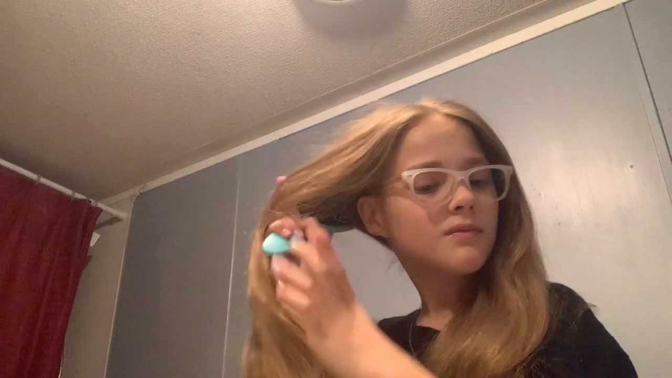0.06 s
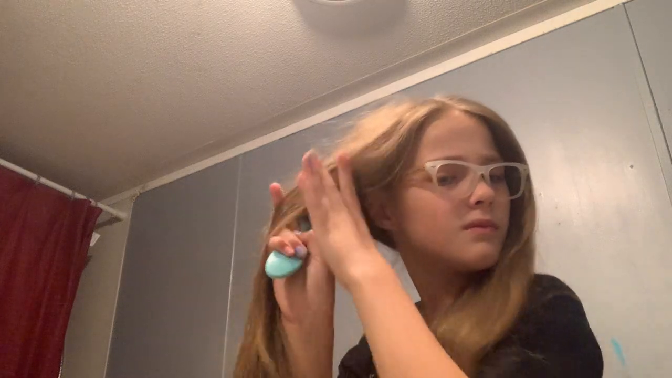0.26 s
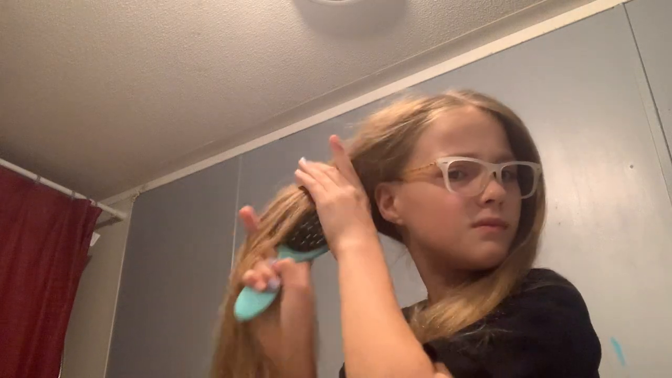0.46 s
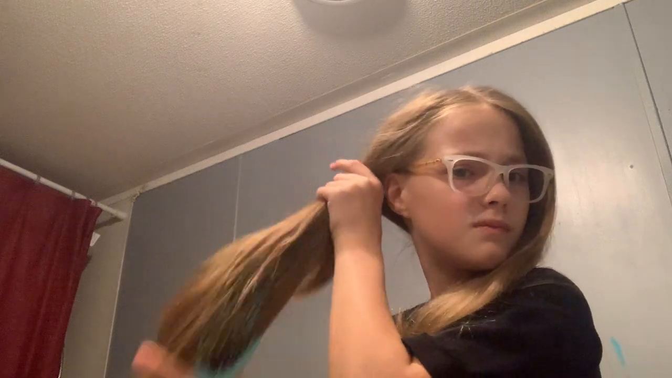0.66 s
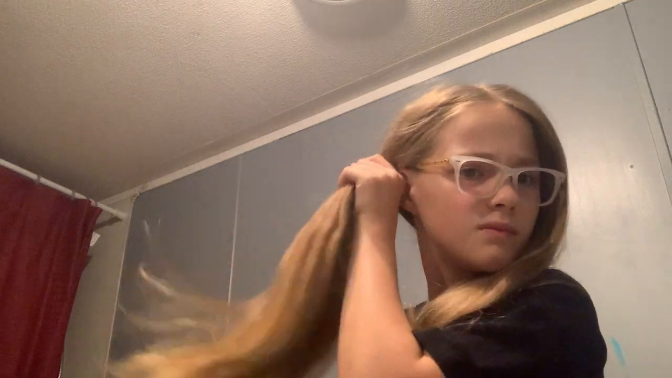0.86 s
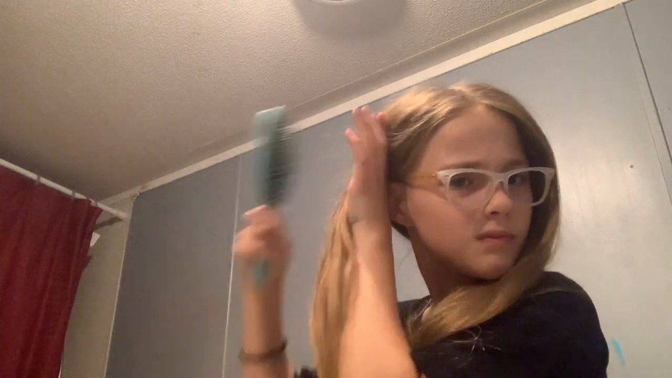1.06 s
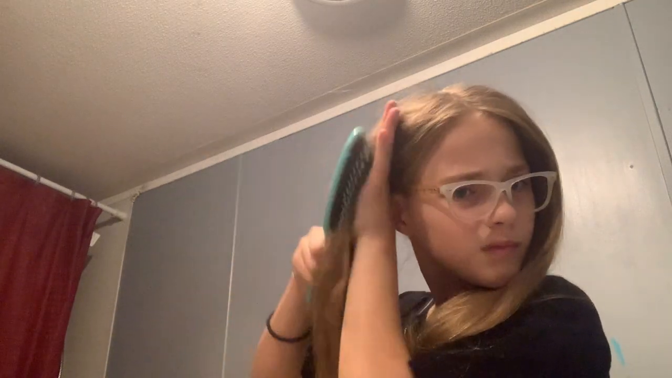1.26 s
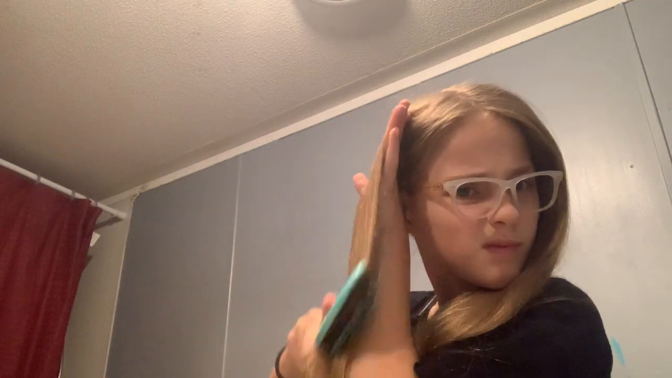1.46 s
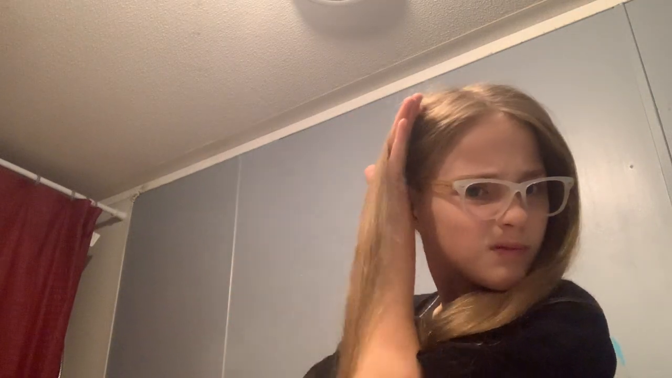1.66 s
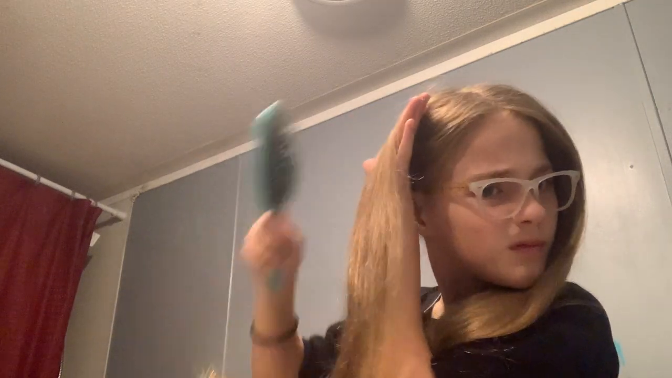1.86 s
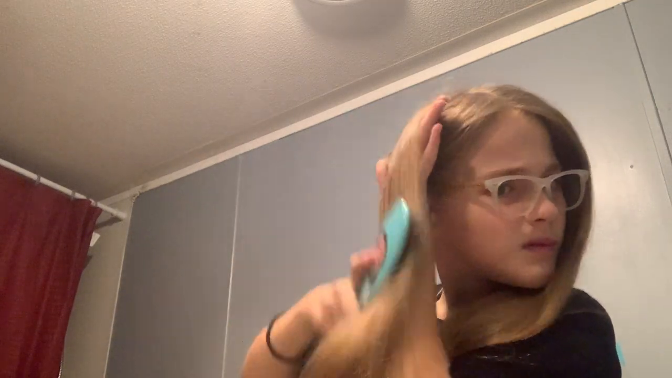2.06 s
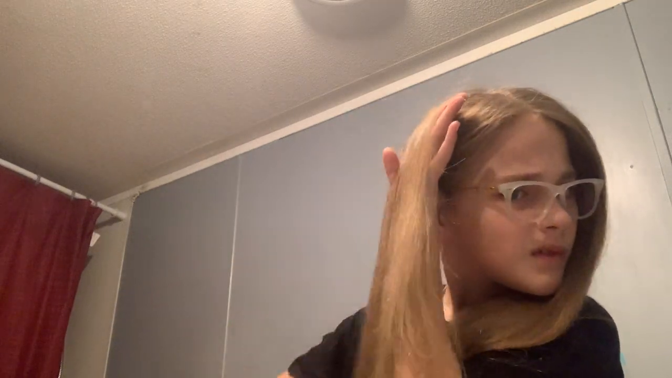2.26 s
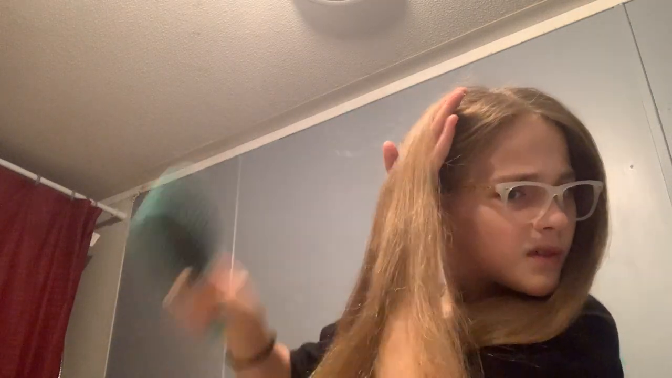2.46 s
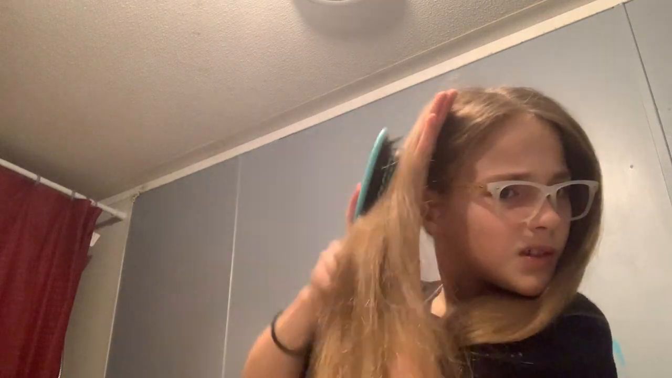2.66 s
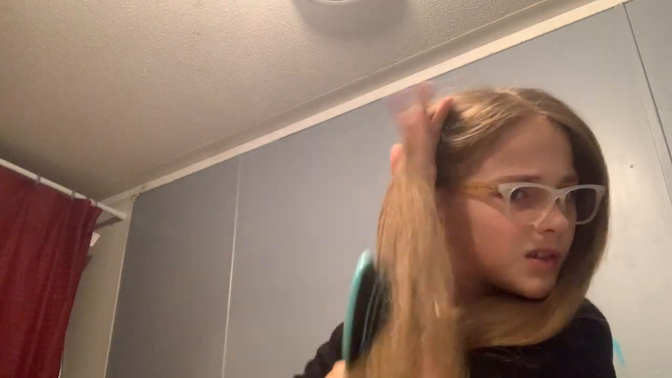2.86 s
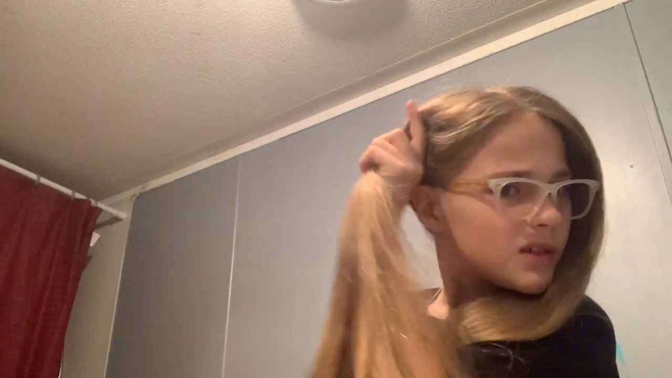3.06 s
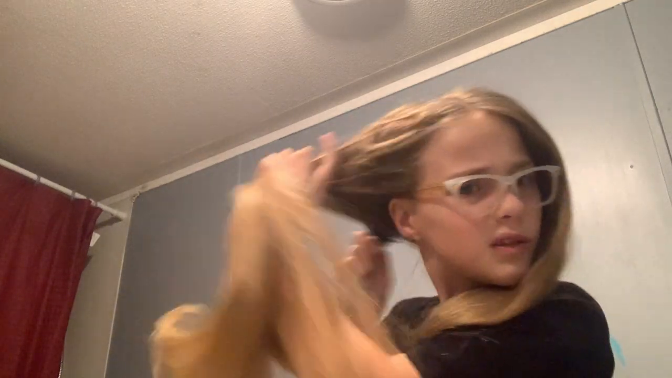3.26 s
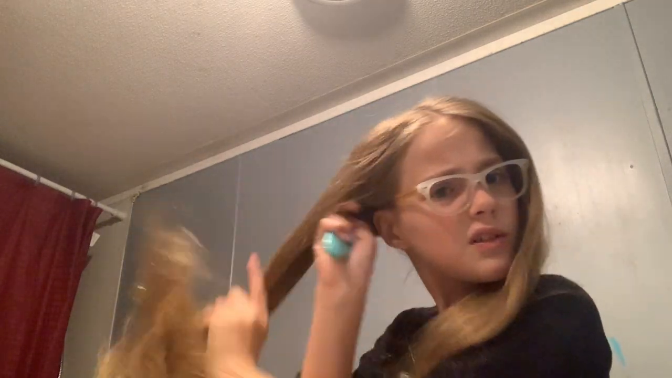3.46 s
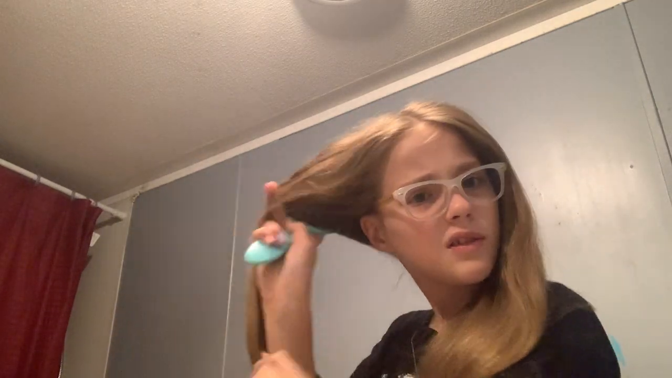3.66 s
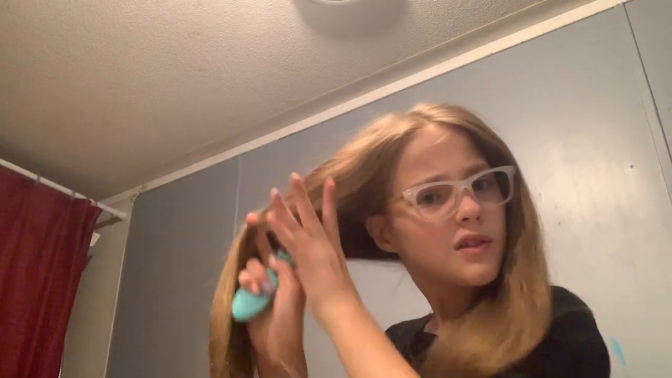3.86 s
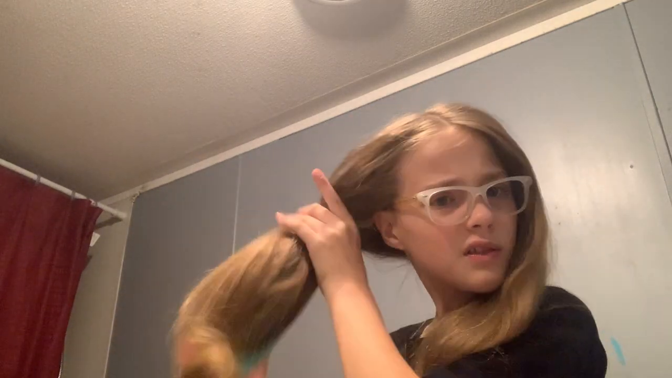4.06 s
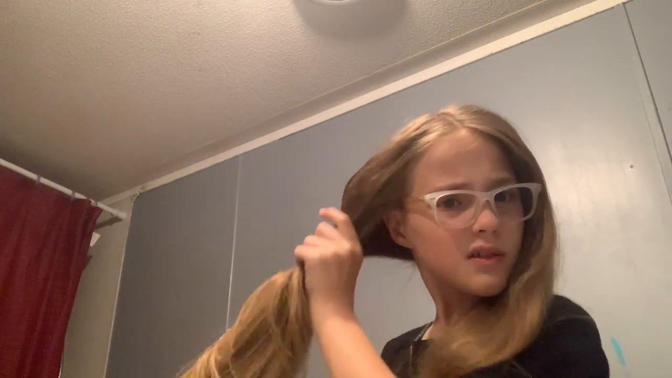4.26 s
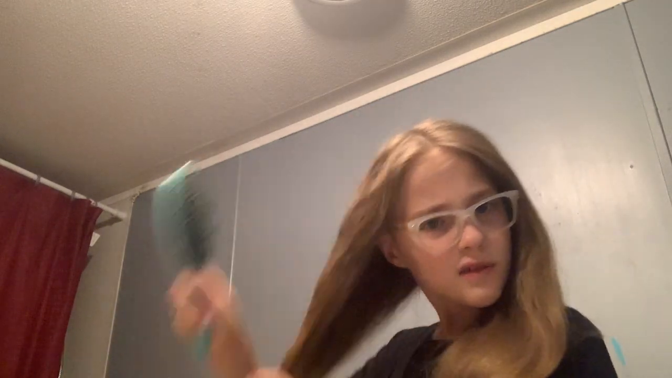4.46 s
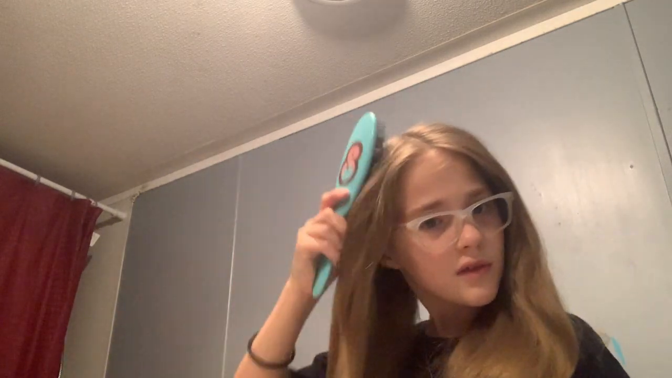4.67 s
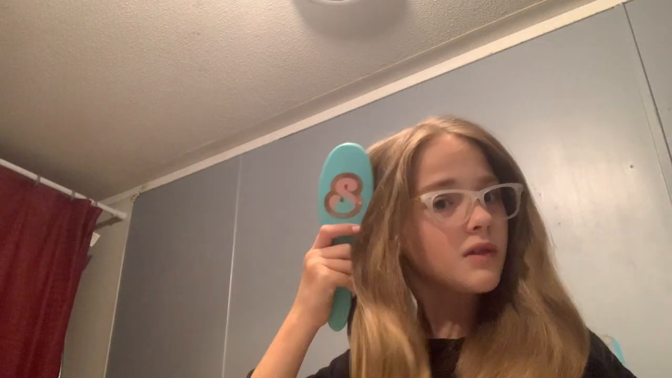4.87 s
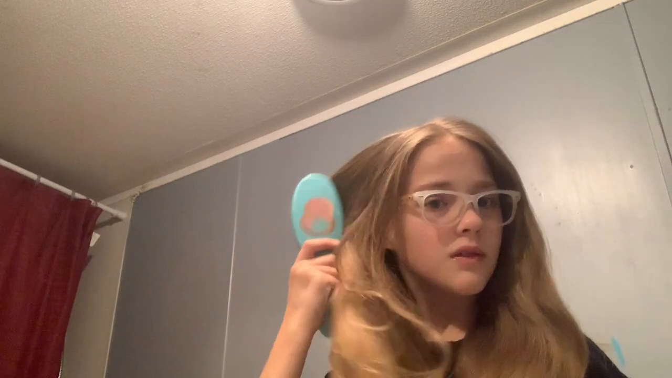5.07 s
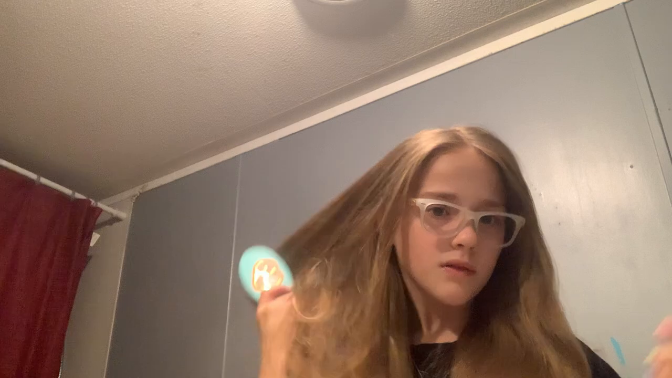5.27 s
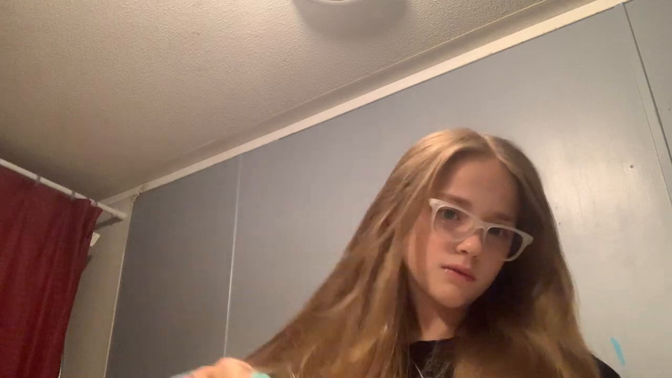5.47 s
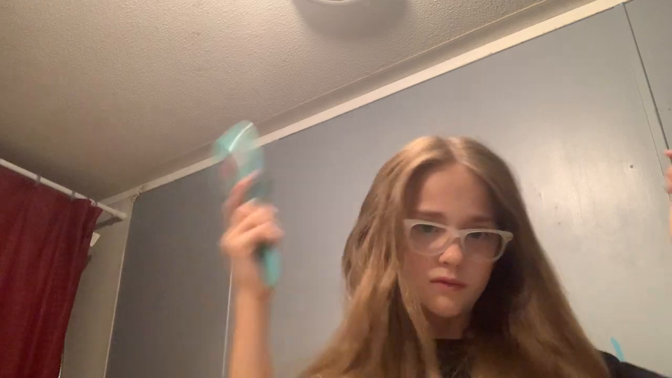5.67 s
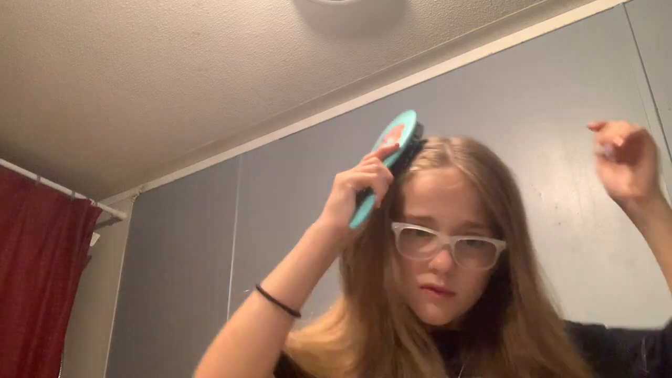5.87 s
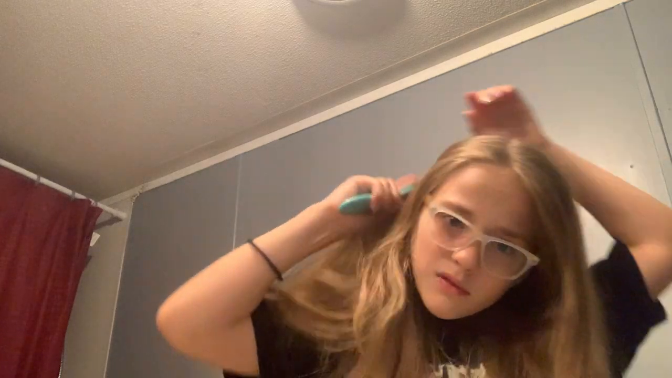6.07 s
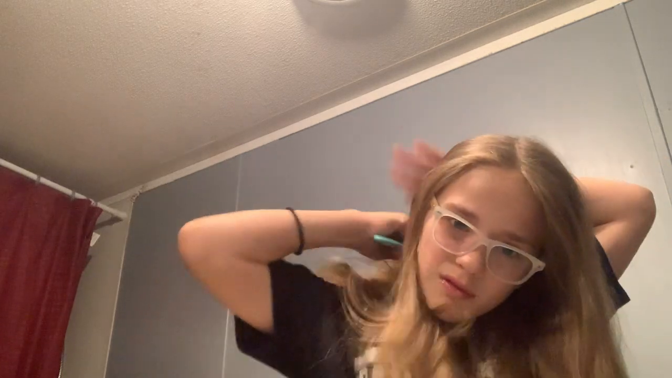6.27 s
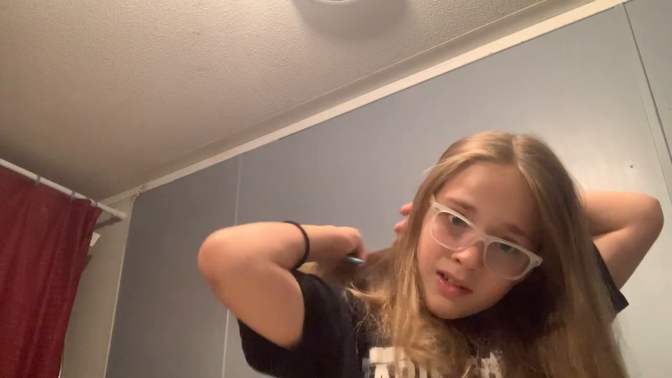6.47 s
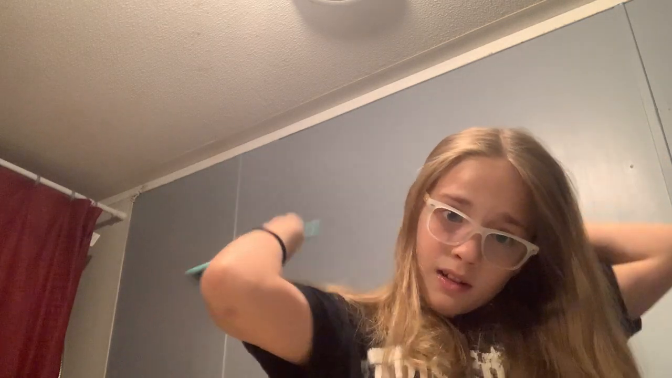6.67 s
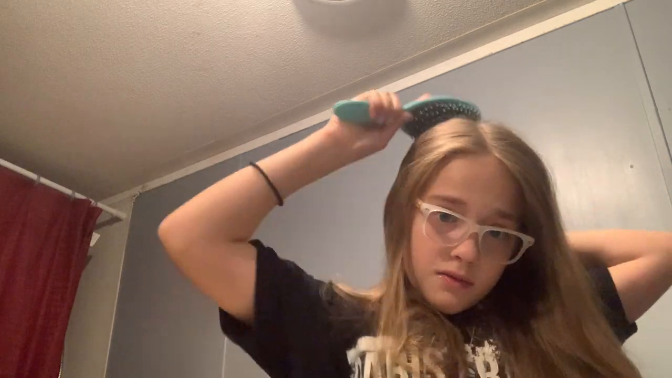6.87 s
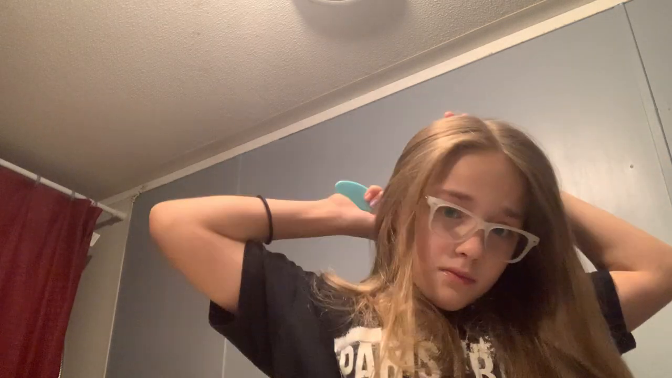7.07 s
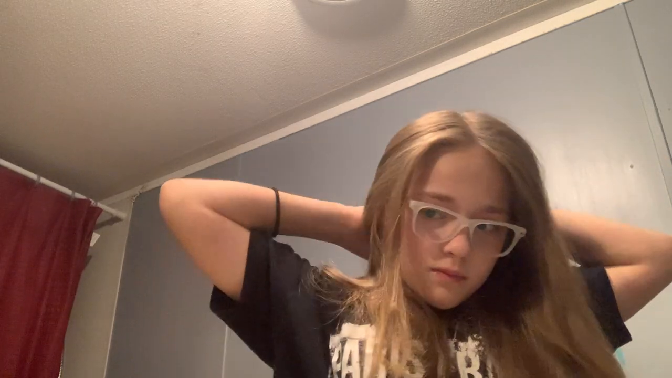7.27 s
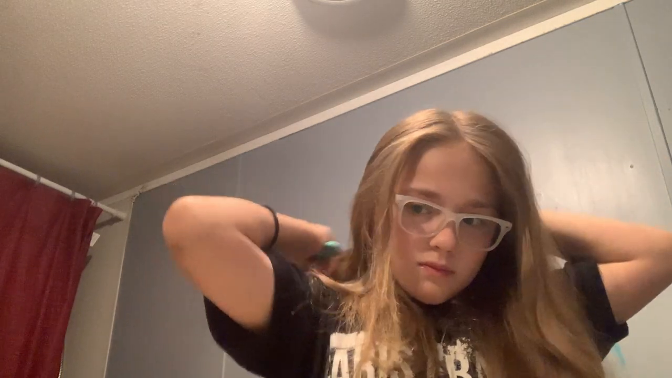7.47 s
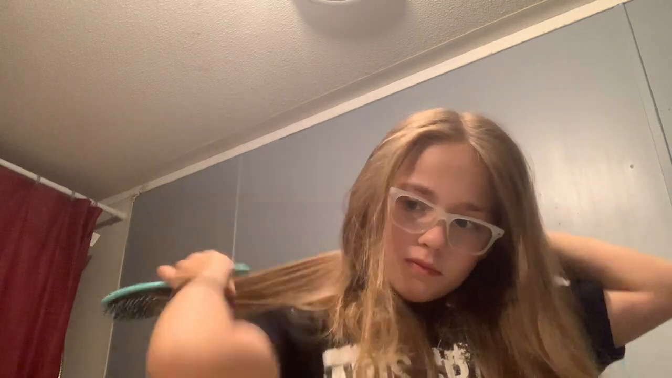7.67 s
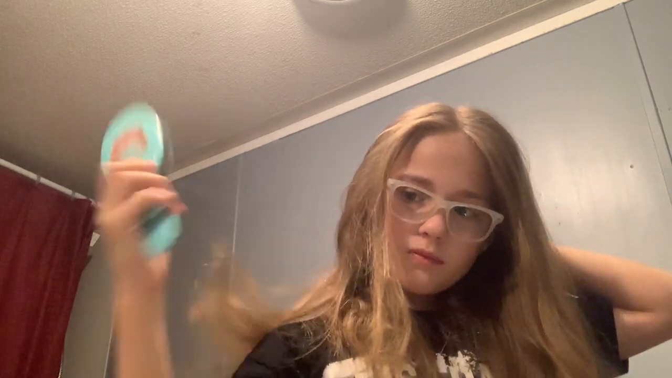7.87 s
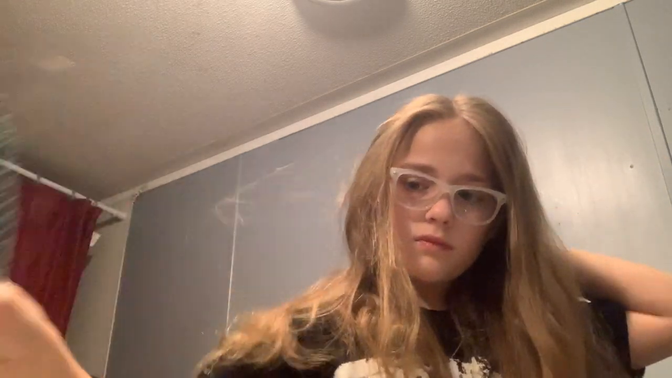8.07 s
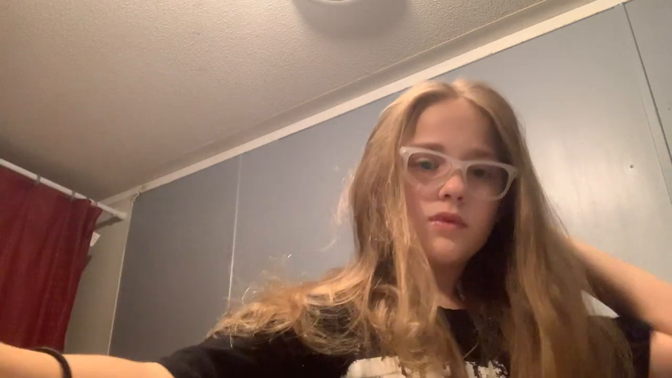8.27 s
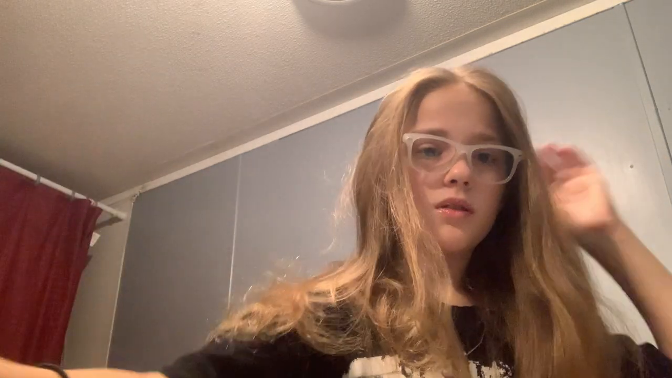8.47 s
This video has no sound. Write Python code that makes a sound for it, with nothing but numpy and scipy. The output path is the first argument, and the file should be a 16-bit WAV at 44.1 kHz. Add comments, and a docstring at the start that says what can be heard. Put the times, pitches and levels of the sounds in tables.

```python
"""Brushing long hair beside a fan

A plastic paddle brush is pulled through long hair, stroke after stroke, in a small room where a fan hums.
Friction noise, from many random slips, makes the strands hiss and rasp; tangles pluck the resonant cushion.
Short decaying noise bursts are flicking bristles, snapping strands and a creaking handle.
At the end the brush meets a counter beside the two-port microphone: damped modes and noise bursts
give its knocks and rocking, and friction noise its slide."""
import sys
import numpy as np
from scipy import signal
from scipy.fft import rfft, irfft, next_fast_len
from scipy.io import wavfile
from scipy.ndimage import uniform_filter1d, map_coordinates

SR = 44100
rng = np.random.default_rng(int(sys.argv[2]) if len(sys.argv) > 2 else 0)


def persist_wave(psi):
    """Save psi, clipped to +-1, as 16-bit WAV."""
    counts = np.round(np.clip(psi, -1, 1) * 32767).astype(np.int16)
    wavfile.write(sys.argv[1], SR, np.atleast_2d(counts).T)


N = 375732  # length in samples

# Pulls of brush or hand through the hair. Each row: start of full contact in seconds, hold in seconds,
# rise in seconds, hiss of sliding strands in dB, rasp of dragging bristles in dB,
# change over the hold in dB, top treble relative to the hiss in dB.
STROKES = [(0.0, 0.32, .1, -60.5, -63, -6.5, -8), (0.63, 0.2, 0.36, -49.5, -55.5, -1.5, -2.5),
           (1.288, .11, 0.15, -55.5, -56.5, -4, -16), (1.448, 0.22, 0.24, -50, -53, -7, -1.5),
           (2.007, 0.037, .03, -68, -60, -1, -2), (2.086, 0.032, 0.089, -54.5, -52.5, 0, -2),
           (2.227, 0.11, .3, -57.5, -53.5, 0.5, -2), (2.554, 0.075, 0.38, -58.5, -58.5, -1.5, -9),
           (2.813, 0.068, 0.061, -53.5, -51, 0, -5), (2.977, 0.076, 0.3, -58, -55.5, 0, -2),
           (3.198, 0.52, 0.14, -77, -69, 8, -2), (3.553, 0.26, 0.17, -62, -70, -2, -3),
           (4.098, 0.18, 0.43, -54, -59.5, 0.5, -1.5), (4.54, 0.29, 0.22, -79, -64, 4, -1),
           (4.97, 0.44, 0.33, -60, -60.5, -0.5, -2), (5.918, 0.042, .05, -54.5, -57, 1.5, -7),
           (6.102, .18, 0.3, -50, -51, -12, -6), (6.41, 0.24, 0.23, -60.5, -56.5, -6, -3),
           (7.045, .02, 0.13, -56, -51.5, -0.5, -5), (7.21, .04, .1, -69, -61, -2.5, -2),
           (7.47, 0.23, 0.28, -63, -63, -4.5, -2)]
# Spectrum of sliding strands. Each row: frequency in Hz, relative level in dB per Hz.
HISS_SPECTRUM = [(2000, -22.5), (5000, -3), (7000, -6), (9000, -3), (11500, -2), (13500, 2), (15000, 6),
                 (16000, -8.5)]
# Spectrum of dragging bristles. Each row: frequency in Hz, relative level in dB per Hz.
RASP_SPECTRUM = [(400, -22), (850, 0.5), (1200, 8.5), (1800, -1.5), (2300, 6.5), (3000, -1.5), (3400, 2),
                 (3850, 1), (4700, -3), (5600, -11), (6400, -4), (9000, -19), (15000, -19)]
REST_HISS_DB, REST_RASP_DB = -86, -65  # hair rustling in the hand between pulls
GRIP_PER_S, GRIP_HISS_DB, GRIP_RASP_DB = 45, 0.9, 0.4  # uneven drag as bristles catch and slip
FIRM_PULL_DB = -55  # rasp level at which rattle and scratch have the levels below
RATTLE_DB, RATTLE_GROWS = -54.5, 0.73  # cushion rattle; its dB per dB of rasp
SCRATCH_DB, SCRATCH_GROWS = -67, 1.15  # ticking bristle tips; their dB per dB of rasp


def strokes():
    """Sliding friction: strands hiss and bristles rasp; a harder pull also excites cushion and bristle tips."""
    glide = np.full(N, amp(REST_HISS_DB))
    sheen = np.zeros(N)
    drag = np.full(N, amp(REST_RASP_DB))
    for start, hold, rise, hiss_db, rasp_db, change_db, sheen_db in STROKES:
        contact = pull(start, hold, rise, change_db)
        # unrelated noises add in power
        glide = np.hypot(glide, amp(hiss_db) * contact)
        sheen = np.hypot(sheen, amp(hiss_db + sheen_db) * contact)
        drag = np.hypot(drag, amp(rasp_db) * contact)
    sheen = np.hypot(sheen, amp(REST_HISS_DB))
    grip = wobble(GRIP_PER_S)

    sliding = friction(HISS_SPECTRUM, slips_per_s=3300, smooth_db=2.0, patchy_db=0.0)
    top = filtered(sliding, lambda hz: along([(11500, 0.017), (14000, 1)], hz))
    hiss = amp(GRIP_HISS_DB * grip) * (glide * (sliding - top) + sheen * top)

    dragging = friction(RASP_SPECTRUM, slips_per_s=800, smooth_db=5.5, patchy_db=2.5)
    rasp = drag * amp(GRIP_RASP_DB * grip) * dragging

    firmness = drag / amp(FIRM_PULL_DB)
    catch_spectrum = [(400, -16.0), (900, -1.5), (5000, 1.0), (9000, -19.5)]
    catches = friction(catch_spectrum, slips_per_s=220, smooth_db=-10.0, patchy_db=1.5)
    rattle = amp(RATTLE_DB) * firmness ** RATTLE_GROWS * cushion(catches)
    scratch = amp(SCRATCH_DB) * firmness ** SCRATCH_GROWS * bristles()
    return hiss + rasp + rattle + scratch


RELEASE_S, FADE_DB = 0.13, 28  # time of running off the hair; depth of each rise and release


def pull(start, hold, rise, change_db):
    """Exponential growth and decay of contact: the brush sinks in, drags and runs off the ends."""
    t = np.arange(N) / SR - start
    away = np.maximum(-t, 0) / rise + np.maximum(t - hold, 0) / RELEASE_S
    drift_db = change_db * np.clip(t / hold, 0, 1)
    return amp(drift_db - FADE_DB * np.minimum(away, 10))


def friction(spectrum, slips_per_s, smooth_db, patchy_db):
    """Stick-slip noise: random slips on a bed of smooth noise, with a shifting colour as strands take load."""
    slips = (rng.random((2, N)) < slips_per_s / SR) * rng.standard_normal((2, N))
    rub = unit(slips) + amp(smooth_db) * rng.standard_normal((2, N))
    return ports(patchy(rub, patchy_db), spectrum, NEAR_ALIKE)


def patchy(x, depth_db):
    """Time-varying spectral colour: random patches, some hundred Hz wide, come and go."""
    z = signal.stft(x, nperseg=1024)[2]
    field = rng.standard_normal(z.shape[1:])
    field = uniform_filter1d(field, size=6, axis=0)  # smooth over frequency
    field = uniform_filter1d(field, size=7, axis=1)  # smooth over time
    return signal.istft(z * amp(depth_db * unit(field)), nperseg=1024)[1][:, :N]


BRISTLES_PER_S, BRISTLE_SIZE_DB = 420, 12  # ticks a second; range of their sizes
BRISTLE_HZ, BRISTLE_SPREAD = 3700, 0.44  # middle pitch; its range either way (natural log)
BRISTLE_T60_S = .005


def bristles():
    """Damped free vibration: bristle tips tick one after another, each with its own pitch and size; rms 1."""
    t = np.arange(SR // 100) / SR
    out = np.zeros((2, N))
    draws = rng.uniform(-1, 1, (int(BRISTLES_PER_S * N / SR), 4))
    for k, (late, pitch, size, phase) in enumerate(draws):
        hz = BRISTLE_HZ * np.exp(BRISTLE_SPREAD * pitch)
        ring = np.sin(2 * np.pi * hz * t + [[0], [np.pi * phase]])  # the ports differ in phase
        decay = amp(BRISTLE_SIZE_DB * size / 2 - 60 * t / BRISTLE_T60_S)
        add(out, abs(k + 2 * late) / BRISTLES_PER_S, decay * ring)
    return unit(out)


# Resonances of the brush's cushion and shell. Each row: frequency in Hz, width in Hz, relative level in dB.
CUSHION = [(360, 74, 4.5), (797, 106, 12), (866, 226, 7), (1170, 125, 3), (2230, 870, -20),
           (4350, 540, -23)]


def cushion(x):
    """Forced resonance: a force on the bristles drives parallel modes of alternating sign; rms 1."""
    def body(hz):
        response = 0
        for k, (centre, width, db) in enumerate(CUSHION):
            damping = 1j * hz * width
            response = response + (-1) ** k * amp(db) * damping / (centre ** 2 - hz ** 2 + damping)
        return response
    return unit(filtered(x, body))


# Tangles and jolts plucking the cushion. Each row: start in seconds, level in dB,
# treble snap in dB (the force spectrum from 3 to 5 kHz, relative to its other points).
TUGS = [(0.811, -40.5, -3), (1.458, -45, 0), (1.543, -41.5, -13), (1.596, -34.5, -5), (1.625, -48, -2),
        (1.656, -46, -6), (2.002, -39.5, -4), (2.069, -37.5, -9), (2.093, -48, -9), (2.252, -46, -4),
        (2.32, -40.5, -9), (2.645, -40.5, 2), (2.806, -42, 0), (2.858, -46, -2), (3.977, -43, 1),
        (6.98, -44, -8), (7.385, -50, 0), (7.713, -34.5, -10), (7.76, -47, -8)]


def tugs():
    """Impulsive excitation: a tangle letting go, or a jolt of the hand, plucks the hollow cushion."""
    out = np.zeros((2, N))
    t = np.arange(SR // 4) / SR
    for s, db, snap_db in TUGS:
        spectrum = [(300, -3.5), (900, -9.0), (3000, snap_db), (5000, snap_db), (10000, -14.0)]
        force = ports(rng.standard_normal((2, len(t))), spectrum, NEAR_ALIKE)
        add(out, s, burst(t, db, t60_s=0.14, attack_s=0.00054) * cushion(force))
    return room(out, wet_db=-2.5)


# Bristles flicking free. Each row: start in seconds, level in dB.
FLICKS = [(1.1974, -55), (1.279, -47), (1.458, -50), (1.994, -49.5), (2.6467, -41.5), (3.329, -43.5),
          (3.5189, -50), (4.295, -39.5), (4.67, -53), (4.7613, -42.5), (4.776, -41.5), (4.956, -48.5),
          (6.8962, -40.5)]
# Spectrum of a flick. Each row: frequency in Hz, relative level in dB per Hz.
FLICK_SPECTRUM = [(800, -7), (3000, -0.5), (5000, -1.5), (8000, -1.5), (12500, -2), (16000, -2)]


def flicks():
    """Elastic release: a bristle springs back against its neighbours in a short bright spit."""
    out = np.zeros((2, N))
    t = np.arange(SR // 4) / SR
    for s, db in FLICKS:
        spit = ports(rng.standard_normal((2, len(t))), FLICK_SPECTRUM, NEAR_ALIKE)
        add(out, s, burst(t, db, t60_s=0.049, attack_s=0.0011) * spit)
    return room(out, wet_db=-3.5)


# Snagged strands snapping off a bristle. Each row: start in seconds, level in dB.
SNAGS = [(1.4588, -33), (1.4632, -31), (1.596, -36), (1.6238, -41), (2.0653, -44), (2.081, -46),
         (2.7996, -35), (2.827, -42), (2.851, -38), (3.9879, -39)]
# Spectrum of a snap. Each row: frequency in Hz, relative level in dB per Hz.
SNAG_SPECTRUM = [(400, 2), (1000, 13.5), (1600, -3), (2200, 4), (3200, -6), (4800, -6.5), (6500, -20),
                 (15000, -15)]


def snags():
    """Sudden release of tension: a snagged strand snaps free with a dry crack."""
    out = np.zeros((2, N))
    t = np.arange(SR // 8) / SR
    for s, db in SNAGS:
        crack = ports(rng.standard_normal((2, len(t))), SNAG_SPECTRUM, NEAR_ALIKE)
        add(out, s, burst(t, db, t60_s=.035, attack_s=0.00074) * crack)
    return room(out, wet_db=-6.0)


# Taut strands singing against the bristles. Each row: start in seconds, hold in seconds, pitch in Hz,
# level in dB.
SCRAPES = [(1.44, .07, 4600, -61), (1.575, .06, 4370, -60), (2.83, .03, 3340, -56), (2.88, .07, 4720, -61),
           (2.977, .06, 4500, -61), (6.38, .025, 5270, -60), (6.405, .035, 3520, -62),
           (6.455, .025, 3630, -58), (6.525, .012, 4070, -62), (6.545, 0.044, 3680, -62),
           (6.64, .025, 4070, -64), (6.727, .015, 4100, -61)]
SCRAPE_RISE_S, SCRAPE_CHANGE_DB = 0.033, -7  # onset; change of level over the hold
SCRAPE_WIDTH_HZ = 170  # half-amplitude distance either side of the pitch
SCRAPE_SLIPS_PER_S, SCRAPE_UNEVEN_DB = 70, 1  # the strands catch and let go


def scrape():
    """Amplitude modulation: slow noise on a tone gives each taut, singing strand a narrow band of its own."""
    t = np.arange(N) / SR
    out = np.zeros((2, N))
    noise = rng.standard_normal((2, N))
    flutter = filtered(noise, lambda hz: 1 / (1 + (hz / SCRAPE_WIDTH_HZ) ** 2))
    flutter = unit(flutter * amp(SCRAPE_UNEVEN_DB * wobble(SCRAPE_SLIPS_PER_S)))
    for s, hold, hz, db in SCRAPES:
        tone = np.sqrt(2) * np.sin(2 * np.pi * hz * t)
        out += amp(db) * pull(s, hold, SCRAPE_RISE_S, SCRAPE_CHANGE_DB) * flutter * tone
    return out


# The handle shifting in the grip. Each row: start in seconds, level in dB.
CREAKS = [(7.712, -50), (7.728, -56), (7.995, -51), (8.003, -49), (8.013, -50)]
# Spectrum of a creak. Each row: frequency in Hz, relative level in dB per Hz.
CREAK_SPECTRUM = [(800, -14), (2200, 1), (2900, 7), (4200, 0), (5500, -4), (7000, -11), (10000, -21),
                  (15000, -20)]


def creaks():
    """Stick-slip in the grip: the plastic handle ticks drily as the hand turns the brush."""
    out = np.zeros((2, N))
    t = np.arange(SR // 8) / SR
    for s, db in CREAKS:
        tick = ports(rng.standard_normal((2, len(t))), CREAK_SPECTRUM, NEAR_ALIKE)
        add(out, s, burst(t, db, t60_s=0.041, attack_s=.001) * tick)
    return room(out, wet_db=-6)


# Brush meeting the counter. Each row: start in seconds, counter ring in dB, shell ring in dB, clack in dB,
# brightness in dB per octave.
KNOCKS = [(8.2705, -48, -80, -31, -6), (8.2774, -22, -33, -16, -1.3), (8.2822, -17, -36, -13, -0.4),
          (8.2875, -21, -43, -18.5, -2), (8.322, -34, -48, -25, 0.5), (8.332, -30, -45, -18, -3),
          (8.3815, -29, -23, -11, 1.9), (8.3856, -29, -27.5, -17, -3), (8.402, -47, -36, -30, -1.5),
          (8.443, -45, -40.5, -31.5, -5)]
# Modes of the counter. Each row: frequency in Hz, relative level in dB, 60 dB decay time in seconds.
COUNTER = [(80.5, -17, 0.29), (150, -9, 0.16), (192, -10, 0.15), (268, -16, 0.17), (312, -14, 0.3),
           (372, -9, 0.18), (492, -1, 0.24), (580, -12, 0.16), (651, 1.5, 0.23), (755, -9, 0.1),
           (868, -22, 0.4), (900, -10, 0.28), (1050, -21, 0.3), (1150, -22, 0.36), (1450, -24, 0.35),
           (1650, -13, .12)]
# Modes of the plastic shell. Each row: frequency in Hz, relative level in dB, 60 dB decay time in seconds.
PADDLE = [(260, -5, 0.046), (359, 7.5, 0.072), (440, 2.5, 0.04), (786, 5.5, 0.089), (1113, -5, 0.18),
          (1297, -2, 0.14), (1340, -5, 0.13), (1660, -9, 0.14), (1945, 4, 0.092), (2316, 5.5, 0.04),
          (2850, -1, .05), (3070, 14, 0.022), (3820, -5, .035), (4400, -1, 0.02), (5300, 6, 0.027),
          (6900, -4, 0.038)]
# Spectrum of a clack. Each row: frequency in Hz, relative level in dB per Hz before the brightness tilt.
CLACK_SPECTRUM = [(100, -11), (170, -10), (240, -6), (380, 4), (600, 6.5), (690, -3), (790, 1), (980, -0.5),
                  (1300, -0.5), (1750, -6), (2250, -4.5), (2650, -5), (3100, -3), (3800, -3), (5300, -6.5),
                  (7200, -8), (11800, -6.5), (16000, -13)]
# Decay of a clack. Each row: frequency in Hz, 60 dB decay time in seconds.
CLACK_DECAY = [(300, 0.13), (1200, 0.2), (3000, 0.084), (12000, 0.063)]
COUNTER_ATTACK_S, SHELL_ATTACK_S = .0035, .001  # the heavy counter takes longer to get ringing
CHATTER_PER_S, CHATTER_DB = 350, 0.5  # the brush buzzes unevenly against the counter after each contact


def knocks():
    """Impact: each contact clacks, and rings the counter and the brush's shell in its own proportion."""
    clacks, rings = np.zeros((2, N)), np.zeros((2, N))
    t = np.arange(SR // 2) / SR
    for s, counter_db, shell_db, clack_db, tilt_db in KNOCKS:
        counter = amp(counter_db) * ringing(COUNTER, t, tilt_db, COUNTER_ATTACK_S)
        shell = amp(shell_db) * ringing(PADDLE, t, tilt_db, SHELL_ATTACK_S)
        add(rings, s, counter + shell)
        colour = [(hz, db + tilt_db * np.log2(hz / 2000)) for hz, db in CLACK_SPECTRUM]
        clack = dying(ports(rng.standard_normal((2, len(t))), colour, NEAR_ALIKE), CLACK_DECAY)
        add(clacks, s, amp(clack_db) * (1 - np.exp(-t / 0.00053)) * clack)
    chatter = amp(CHATTER_DB * wobble(CHATTER_PER_S))
    return room(clacks, wet_db=-4) * chatter + rings


# Port difference of the rings. Each row: frequency in Hz, left minus right in dB.
RING_LEAN = [(180, 6), (380, 11), (700, 12), (1200, -4), (2300, 15), (4400, -1)]


def ringing(modes, t, tilt_db, attack_s):
    """Modal superposition: damped modes, tilted by the blow's hardness, reach each port in their own way."""
    hz, db, t60 = np.transpose(modes)[:, :, None]
    left_right = np.array([.5, -.5])[:, None, None]
    lean = amp(left_right * along(RING_LEAN, hz))
    lag = np.array([0, 1])[:, None, None] * rng.normal(2.1, 1.0, hz.shape)  # right port, radians
    phase = rng.uniform(0, 2 * np.pi, hz.shape) + lag
    level = db + tilt_db * np.log2(hz / np.median(hz)) + rng.normal(0, 1, hz.shape)
    partials = lean * amp(level - 60 * t / t60) * np.sin(2 * np.pi * hz * t + phase)
    return (1 - np.exp(-t / attack_s)) * partials.sum(axis=1)


# The brush sliding. Each row: time in seconds, level in dB.
SLIDE = [(8.40, -89), (8.45, -58), (8.475, -38), (8.495, -32), (8.52, -36)]
# Spectrum of the slide. Each row: frequency in Hz, relative level in dB per Hz.
SLIDE_SPECTRUM = [(2000, -28), (6500, -13), (9000, 2), (11000, -4), (12700, -1), (15000, -13), (16000, -14)]


def slide():
    """Sliding friction: the bristles scrape briefly over the counter top."""
    level_db, = curves(SLIDE)
    started = np.arange(N) / SR > SLIDE[0][0]
    return started * amp(level_db) * friction(SLIDE_SPECTRUM, slips_per_s=3400, smooth_db=7.0, patchy_db=1)


# Fan tones. Each row: frequency in Hz, rms level in dB before waver and lean, waver in dB.
HUM = [(33.8, -61, 3.5), (101.1, -43.5, 3.5), (120.26, -35.8, -0.1), (202.3, -52.5, 4), (505, -54.5, 1.5),
       (608, -54.5, 1)]
# Room and duct resonances in the fan's rush. Each row: frequency in Hz, width in Hz, boost in dB.
DUCT = [(71.6, 8, 2), (94, 17.8, 5.5), (139.7, 10, 1), (165.5, 24.8, 10.5), (212, 14, -3.5),
        (239.8, 29, 8.5), (286.5, 33, 10.5), (401.3, 27, 12), (464.5, 19, 12.5), (526.5, 54, 7.5),
        (597, 85, 7), (1158, 81, 11), (1633, 120, 7.5), (1958, 120, 7)]
# Spectrum of the rush. Each row: frequency in Hz, relative level in dB per Hz before the resonances.
FAN_SPECTRUM = [(22, -37.5), (46, -30), (68, -3.5), (100, -3.5), (135, -7.5), (190, -14.5), (340, -24),
                (620, -23.5), (760, -30.5), (1400, -36.5), (3000, -47.5), (6000, -61), (9000, -75.5),
                (15000, -92)]
# Port likeness of the rush. Each row: frequency in Hz, left-right correlation (clipped to +-0.99).
FAR_ALIKE = [(150, 1.5), (280, 1.7), (450, 1), (800, -0.3), (1500, 0.12), (3000, 0.9), (5500, 1),
             (8300, -3.5), (10500, -3.5), (12500, -1), (15500, -4.5)]
# Port difference of the fan. Each row: frequency in Hz, left minus right in dB.
FAN_LEAN = [(40, 1.5), (100, 2.5), (200, 0.5), (290, -2), (390, 9.5), (500, 2), (640, 9.5), (1000, -3.5),
            (2000, 3), (8000, 10.5)]


def fan():
    """Broadband flow noise and tones: air rushes through resonances; the motor adds unsteady tones."""
    t = np.arange(N) / SR

    def bumps(hz):
        return amp(sum(db / (1 + (2 * (hz - centre) / width) ** 2) for centre, width, db in DUCT))

    rush = ports(rng.standard_normal((2, N)), FAN_SPECTRUM, FAR_ALIKE)
    air = unit(filtered(rush, bumps))
    tones = np.zeros(N)
    for hz, db, waver in HUM:
        level = amp(db + waver * wobble(5.4))
        tones += level * np.sqrt(2) * np.sin(2 * np.pi * hz * t + 0.66 * wobble(5.9))
    return filtered(amp(-33.5) * air + tones, lambda hz: amp(np.outer([.5, -.5], along(FAN_LEAN, hz))))


# Decay of the room. Each row: frequency in Hz, 60 dB decay time in seconds.
ROOM = [(100, 0.33), (500, 0.1), (3000, 0.3), (12000, 0.19)]


def room(x, wet_db):
    """Reverberation: the close walls answer after a few milliseconds with a decaying noise tail."""
    tail = dying(rng.standard_normal((1, SR // 2)), ROOM)
    tail = np.pad(tail / np.linalg.norm(tail), ((0, 0), (round(0.0065 * SR), 0)))
    return x + amp(wet_db) * signal.fftconvolve(x, tail, axes=1)[:, :x.shape[-1]]


def burst(t, db, t60_s, attack_s):
    """Exponential decay with a short smooth attack."""
    return amp(db - 60 * t / t60_s) * (1 - np.exp(-t / attack_s))


def dying(x, decays):
    """Frequency-dependent damping: each frequency of x dies at its own speed."""
    hz, t, z = signal.stft(x, SR, nperseg=256)
    fade = amp(-60 * t / along(decays, hz)[:, None])
    return signal.istft(z * fade, SR, nperseg=256)[1][:, :x.shape[-1]]


# Port likeness of the near sounds. Each row: frequency in Hz, left-right correlation (clipped to +-0.99).
NEAR_ALIKE = [(150, 0.53), (500, 0.29), (1200, 0.18), (3000, 0.06), (5000, -0.24), (6400, -0.052),
              (7400, -0.89), (8700, -1.46), (10000, 0.064), (12400, 1), (14000, 0.5), (15500, -1.1)]


def ports(pair, spectrum, alike):
    """Interchannel coherence: two unrelated signals become a coloured, partly alike pair of rms 1."""
    def mid_side(hz):
        turn = np.arccos(np.clip(along(alike, hz), -.99, .99)) / 2
        return amp(along(spectrum, hz)) * [np.cos(turn), np.sin(turn)]
    mid, side = filtered(pair, mid_side)
    return unit(np.array([mid + side, mid - side]))


def filtered(x, response):
    """Linear filtering: the spectrum of x times a response of frequency."""
    n = x.shape[-1]
    m = next_fast_len(n + 8192)
    return irfft(rfft(x, m) * response(np.fft.rfftfreq(m, 1 / SR)), m)[..., :n]


def wobble(rate):
    """Band-limited fluctuation: a smooth random curve, rate knots a second."""
    knots = rng.standard_normal(int(N * rate / SR) + 4)
    return map_coordinates(knots, [np.arange(N) * rate / SR])


def along(points, hz):
    """Logarithmic frequency scale: read (Hz, value) points by interpolation."""
    f, v = np.transpose(points)
    return np.interp(np.log(hz + 1), np.log(f + 1), v)


def curves(rows):
    """Linear interpolation: one value per sample for each column after the time."""
    s, *cols = np.transpose(rows)
    return [np.interp(np.arange(N) / SR, s, c) for c in cols]


def amp(db):
    """Logarithmic level: decibels to gain."""
    return 10 ** (np.asarray(db) / 20)


def unit(x):
    """Power normalization: scale to rms 1."""
    return x / np.sqrt(np.mean(x ** 2) + 1e-20)


def add(track, s, sound):
    """Superposition: mix a sound into the track at time s."""
    part = track[:, round(s * SR):][:, :sound.shape[-1]]
    part += sound[:, :part.shape[-1]]


def scene():
    """Superposition of the brushing and the knocks over the fan."""
    brushing = strokes() + tugs() + flicks() + snags() + scrape() + creaks()
    return brushing + knocks() + slide() + fan()


TOP_HZ = 15830  # band limit, at half amplitude


def record(dry):
    """Saturation and band limiting: the highest peaks are rounded off and the top rolls off steeply."""
    rounded = dry / (1 + np.abs(dry / .9) ** 6) ** (1 / 6)
    return filtered(rounded, lambda hz: 1 / (1 + (hz / TOP_HZ) ** 240))


dry = scene()
out = record(dry)
persist_wave(out)
```